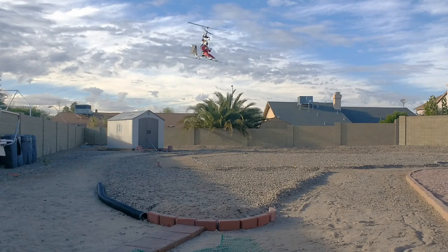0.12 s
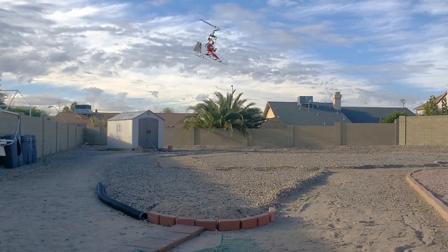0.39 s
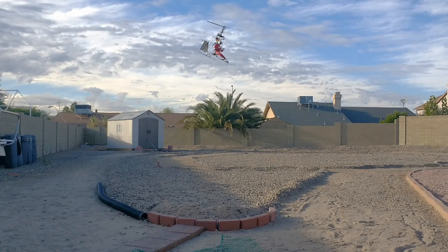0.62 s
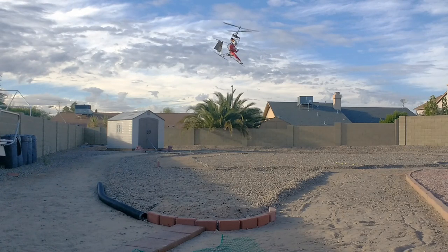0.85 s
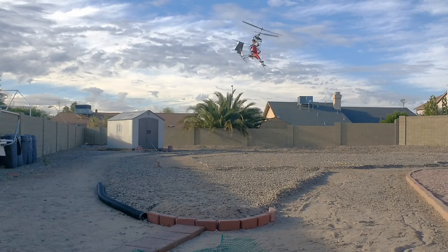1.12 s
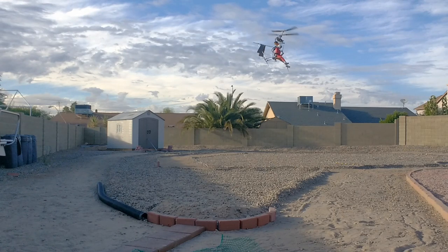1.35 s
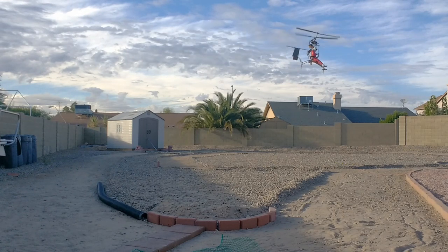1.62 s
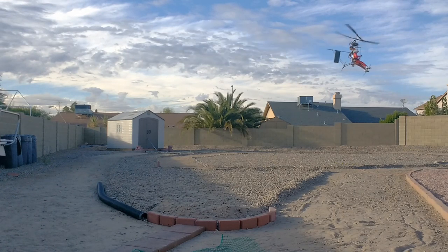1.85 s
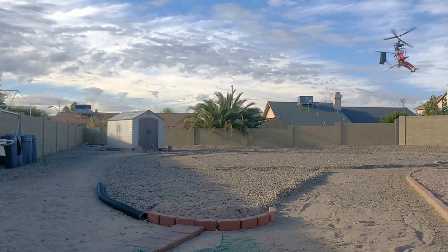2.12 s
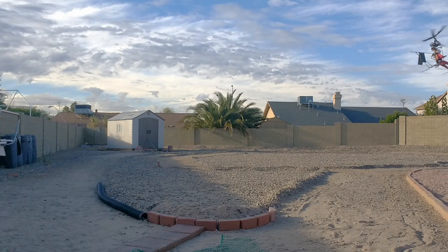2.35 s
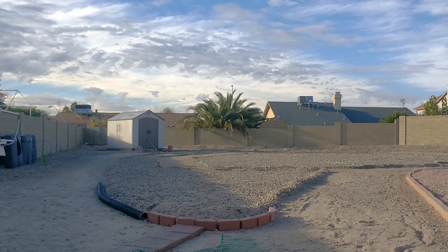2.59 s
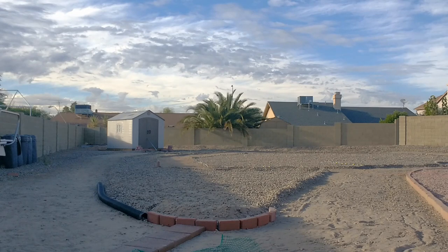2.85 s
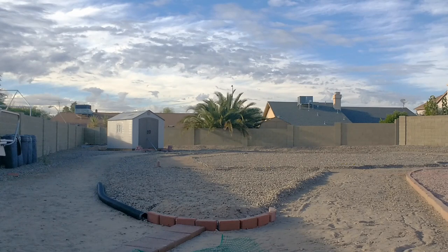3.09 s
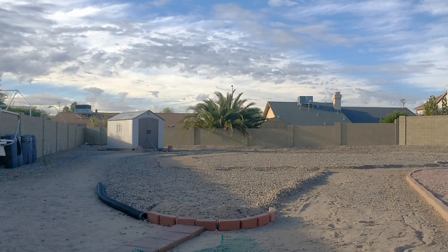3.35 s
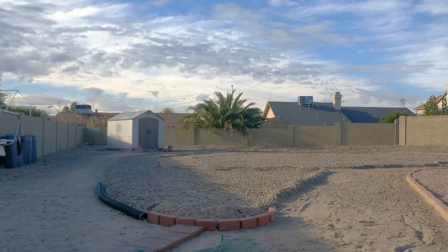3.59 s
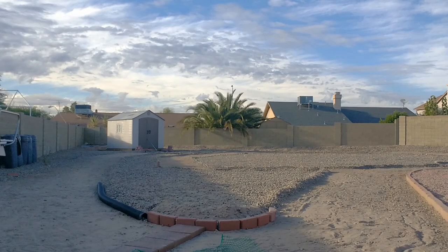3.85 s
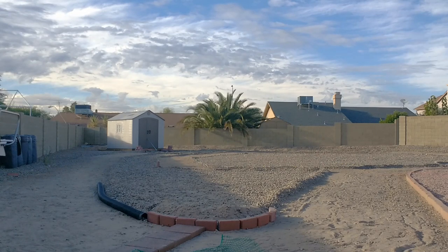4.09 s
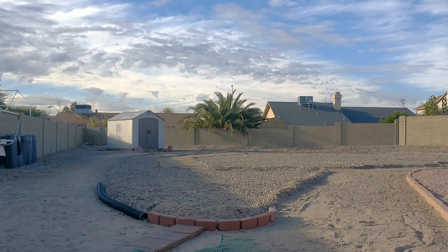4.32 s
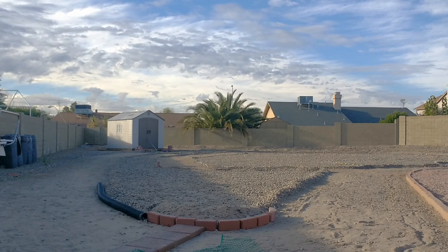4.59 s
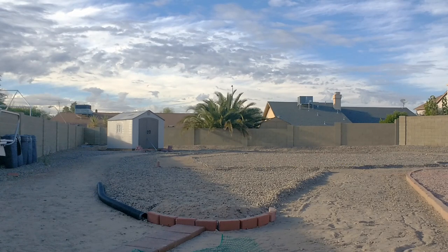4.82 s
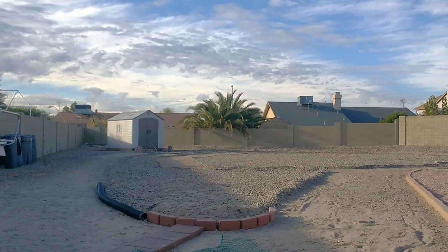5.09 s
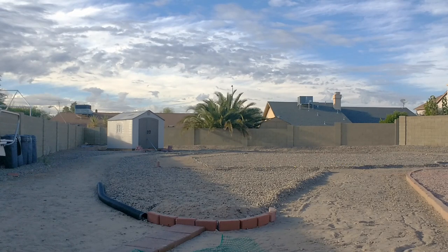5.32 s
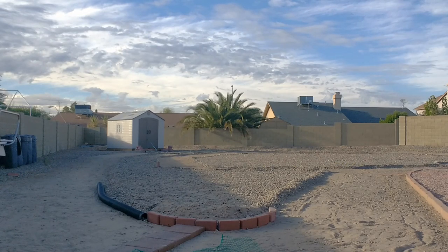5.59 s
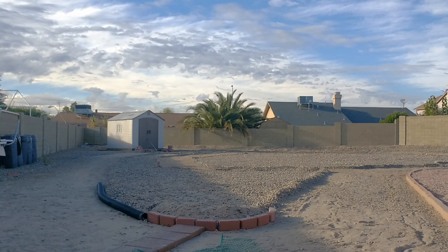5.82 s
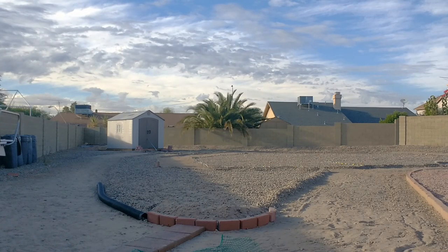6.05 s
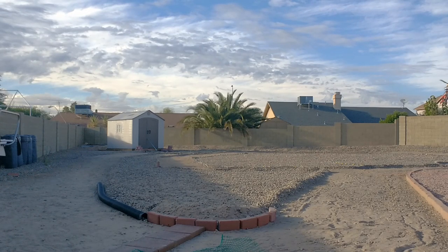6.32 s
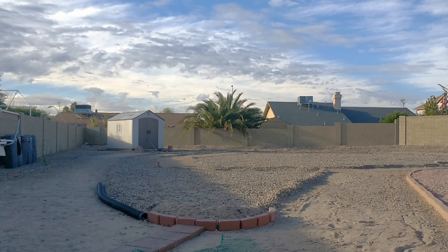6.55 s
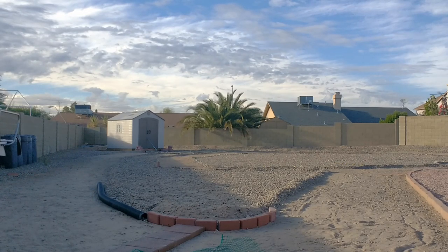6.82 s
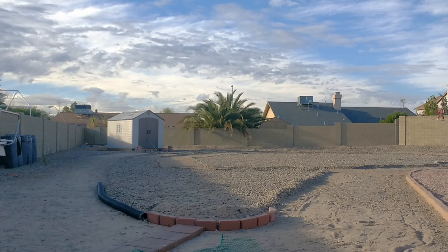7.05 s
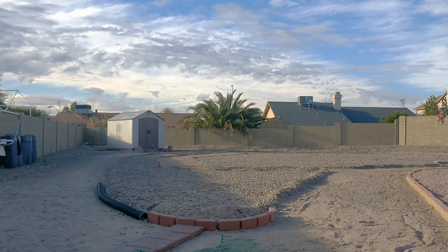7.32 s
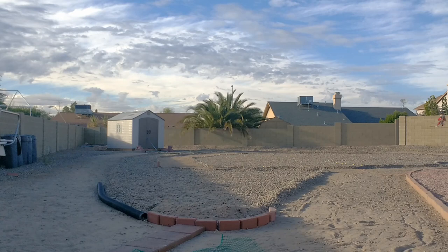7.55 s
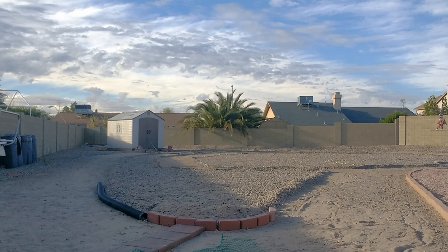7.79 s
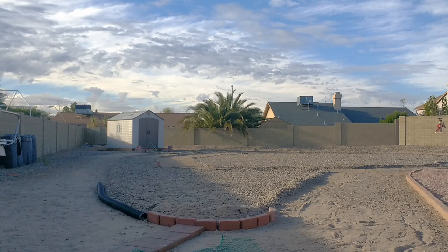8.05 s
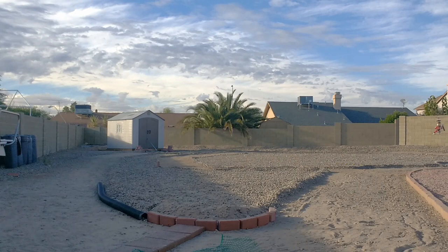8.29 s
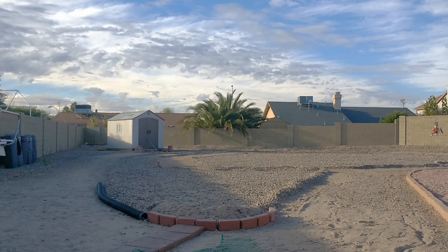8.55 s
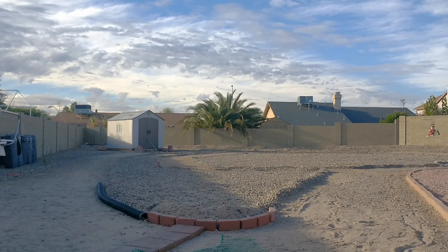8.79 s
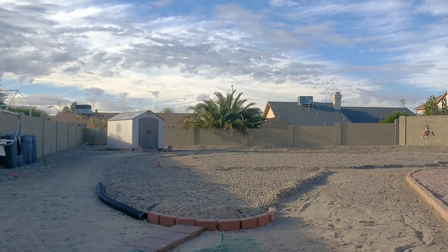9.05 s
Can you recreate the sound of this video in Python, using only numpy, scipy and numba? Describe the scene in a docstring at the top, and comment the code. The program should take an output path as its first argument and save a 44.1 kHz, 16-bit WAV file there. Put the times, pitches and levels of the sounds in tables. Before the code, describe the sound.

A small electric model helicopter hovers in a walled yard, a thin gritty gear whine and hissing blades fluttering continuously, with a brief wind bump early.

```python
"""A small electric helicopter hovers in a walled yard, then drifts away. Its gear chatter excites frame
resonances and a mesh whine; blade swish and hiss are shaped noise, and the rotor throb modulates them all.
Delayed copies make the yard's echoes; a few short wobbles are gusts on the microphone.
Underneath lie low noise, for far traffic and downwash, and light wind.
The sound is slowed at unchanged pitch, each channel by itself, by repeating short stretches."""
import sys
import numpy as np
from scipy import signal
from scipy.fft import rfft, irfft, next_fast_len
from scipy.io import wavfile
from scipy.ndimage import uniform_filter1d
from numba import njit

SR = 44100
rng = np.random.default_rng(int(sys.argv[2]) if len(sys.argv) > 2 else 0)


def rack_gain(trim_db):
    """Turn a fader trim in dB into the linear factor to multiply a signal by."""
    fader = np.asarray(trim_db, float)
    return 10 ** (fader / 20)


def dump_mix(stems):
    """Bounce the given channels to the path in sys.argv[1] as a 16-bit WAV at rate SR."""
    frames = np.atleast_2d(stems).T  # one column per channel
    limited = np.clip(frames, -1, 1)  # hard clip at full scale
    pcm = np.round(limited * 32767).astype(np.int16)
    wavfile.write(sys.argv[1], SR, pcm)


N = 403956
SPEED = .7  # playing speed
HEARD = np.arange(N) / SR / SPEED  # when each live moment is heard after slowing [s]

# course of the craft: (time as heard [s], distance [m], rotor load [0-1], mesh whine [Hz])
FLIGHT = [(0, 8.1, 0.28, 2751), (.4, 8.07, 0.42, 2725), (.75, 8.44, 0, 2705), (1.2, 7.93, 0.35, 2698),
          (1.45, 8.27, 0.69, 2667), (1.5, 9.06, 0.13, 2667), (1.62, 8.63, 0.46, 2655),
          (1.9, 8.43, 0.74, 2636), (2.5, 9.5, .95, 2622), (3.15, 8.9, 0.96, 2569), (3.2, 9.4, 0.72, 2555),
          (3.32, 10.2, 0.3, 2532), (3.55, 9.44, 0.33, 2500), (4.15, 9.66, 0.1, 2472),
          (4.28, 10.1, 0.18, 2474), (4.34, 9.25, 0.68, 2473), (4.44, 9.6, 0.25, 2477),
          (4.52, 10.5, .4, 2471), (5.25, 10.34, 0.51, 2510), (5.85, 11.5, 0.18, 2557),
          (6.3, 10.74, 0.42, 2613), (6.6, 10.2, 0.68, 2672), (6.85, 10.67, 0.9, 2710),
          (7.8, 10.23, 0.63, 2660), (8.25, 10.7, 0.33, 2644), (9.16, 10.3, 0.11, 2662)]


def helicopter():
    """Amplitude modulation: one rotor throb shapes the sum of all the craft's parts."""
    ringing = frame() + mesh_whine() + steady_bands() + screened_bands() + glimpsed_bands()
    blades = hiss() + sheen() + swish()
    return throb(depth_db=.7, pair_db=1.3, flicker_db=.85, eddy_db=0.10002) * (ringing + blades)


def throb(depth_db, pair_db, flicker_db, eddy_db):
    """Periodic blade loading: gain swells each turn and as two rotors' blades cross; turbulence flutters it."""
    blade_hz = 27.907 * (1 + .03 * walk(3))
    turn = 2 * np.pi * np.cumsum(blade_hz) / SR
    swell_db = depth_db * np.cos(turn) + pair_db * np.cos(2.12 * turn)
    turbulence_db = flicker_db * flutter(110) + eddy_db * flutter(25)
    return unit(rack_gain(swell_db + turbulence_db))


def chatter(spread_db):
    """Random excitation: dense tooth knocks of uneven strength."""
    return rng.standard_normal(N) * rack_gain(spread_db * walk(400))


def frame():
    """Modal resonance: gear chatter rings the lower and upper modes of the frame."""
    # lower frame modes: (frequency [Hz], width of each filter pass [Hz], relative level [dB])
    low_modes = [(1879, 320, -8), (2255.2, 400, -2), (2952, 500, -1)]
    # upper frame modes: (frequency [Hz], width of each filter pass [Hz], relative level [dB])
    high_modes = [(3255, 400, -3), (3592, 400, -1.5), (3960.5, 450, -1), (4249.4, 400, -3), (4646, 600, -3)]
    low_gain = heard(2300, db=-42, load_db=0.69, facing_deg=125, away_db=2)
    high_gain = heard(4200, db=-41.5, load_db=1.5, facing_deg=250, away_db=2)
    return low_gain * mode_sum(low_modes) + high_gain * mode_sum(high_modes)


def mode_sum(modes):
    """Modal superposition: the modes add, each waxing and waning a little by itself."""
    total = 0
    for hz, width, db in modes:
        total = total + rack_gain(db + 1.4 * flutter(30)) * ring(chatter(1.5), hz, width)
    return unit(total)


def mesh_whine():
    """Tooth-mesh resonance: chatter rings a band that follows the motor; the body screens it for a while."""
    mesh_hz = curves(FLIGHT)[2]
    start_s, fall_s, end_s, rise_s, lost_db = 3.0, 0.2, 4.8, 1.0, 7  # recovery begins at end_s
    falling = (HEARD - start_s) / fall_s
    recovering = 1 - (HEARD - end_s) / rise_s
    screen = rack_gain(-lost_db * np.clip(np.minimum(falling, recovering), 0, 1))
    whine = ring(chatter(1.5), mesh_hz * (1 + .004 * walk(8)), 145) * rack_gain(1.5 * flutter(55))
    return screen * heard(mesh_hz, db=-43, load_db=1.5, facing_deg=71, away_db=2) * whine


def burst(hz, width):
    """Resonance with unsteady excitation: a band of chatter noise wanders a little and comes in bursts."""
    return unit(rack_gain(2.5 * flutter(55)) * ring(chatter(1.5), hz * (1 + .005 * walk(6)), width))


def steady_bands():
    """Directivity: bands of chatter present throughout swell and sink as the craft turns."""
    # chatter bands: (frequency [Hz], width of each filter pass [Hz])
    bands = [(4008, 360), (9290, 450), (625.2, 272.8), (1197.1, 200), (2100, 190), (2400.4, 200)]
    # how each band is heard: (relative level at 8 m [dB], gain at full load [dB],
    # heading where loudest [deg], loss facing away [dB])
    band_levels = [(-46.5, 0.89, 150, 5), (-45.5, 4.5, 290, 4), (-53, 2.3, 100, 24), (-63, 9.7, 53, 2.694),
                   (-48, .7, 145, 2), (-45, .7, 270, 3)]
    return sum(heard(hz, *part) * burst(hz, width) for part, (hz, width) in zip(band_levels, bands))


def screened_bands():
    """Acoustic shadow: the turning body screens these bands for good."""
    # fading bands: (frequency [Hz], width of each filter pass [Hz], relative level at 8 m [dB],
    # fade start as heard [s], fade length as heard [s], loss [dB])
    fading_bands = [(4482.4, 200, -48, 1.64, 0.4, 6), (5799, 780, -47, 0.552, 0.3004, 20),
                    (3398, 300, -49, .8, .3, 20)]
    total = 0
    for hz, width, db, start, fall, lost_db in fading_bands:
        shadow_db = lost_db * np.clip((HEARD - start) / fall, 0, 1)
        total = total + heard(hz, db - shadow_db, load_db=1.5, facing_deg=0, away_db=0) * burst(hz, width)
    return total


def glimpsed_bands():
    """Directivity: these bands are heard only while their part faces the microphone."""
    # passing bands: (frequency [Hz], width of each filter pass [Hz], relative level at 8 m [dB],
    # from as heard [s], until as heard [s])
    passing_bands = [(4417, 120, -46.5, 1.55, 2.75), (4049, 220, -46, 0.38, 2.2),
                     (2380.5, 160, -46, 1.6, 3.1), (2070.6, 200, -45, 2.6, 5.2), (2360, 180, -43, 4.2, 6.9),
                     (2119, 200, -45, 8.1, 9.5), (2427, 190, -44, 7, 9.5), (6996, 350, -49, 3.4, 5.3),
                     (6344, 401, -51, 4.1, 5.0), (8050, 250, -49, 2.5, 3.1), (8052, 250, -52, 4.1, 4.7),
                     (1210.3, 230, -59.5, 5.3, 7.8), (949.8, 299.4, -58, 6.5, 7.6),
                     (1510, 180, -58, 6.5, 8.21), (650, 400, -58.5, 4.5, 6.7), (12598, 1500, -50, 1.5, 3.2),
                     (10894, 900, -54, 6.5, 8.0), (2948, 200, -50, 6.8, 7.5), (2249.6, 300, -47, -.5, 1.1),
                     (210, 150, -58, 7.5, 9.5)]
    total = 0
    for hz, width, db, start, end in passing_bands:
        gain = heard(hz, db, load_db=1.5, facing_deg=0, away_db=0) * window(start, end, edge_s=.25)
        total = total + gain * burst(hz, width)
    return total


def swish():
    """Broadband blade noise: shaped low and middle noise that grows with rotor load."""
    # swish spectrum: (frequency [Hz], relative level [dB])
    swish_spectrum = [(100, -50), (200, -14), (290, -8), (380, -1), (520, -5), (700, -4), (900, -5),
                      (1200, -5), (1400, -7), (1650, -5), (1900, -6), (2600, -30), (5000, -80)]
    return heard(670.0, db=-50.5, load_db=5, facing_deg=107, away_db=3) * coloured(swish_spectrum)


def hiss():
    """Turbulence noise: a patchy hiss and the airy top above it."""
    # hiss spectrum: (frequency [Hz], relative level [dB])
    hiss_spectrum = [(2000, -60), (3900, -16), (4600, -2), (5300, -5), (6000, -2), (7000, -1.5), (8100, 0),
                     (9000, 0), (9700, -4), (10400, -8), (12000, -24), (16000, -70)]
    # airy top spectrum: (frequency [Hz], relative level [dB])
    air_spectrum = [(5000, -65), (8500, -20), (10000, -3), (11200, -5), (11850, -14), (12400, -5),
                    (13200, -1), (14500, -6), (15400, -11)]
    hiss_gain = heard(7500, db=-37.5, load_db=1.5, facing_deg=187, away_db=1.39)
    air_gain = heard(12000, db=-43, load_db=4, facing_deg=210, away_db=3)
    return hiss_gain * patchy(coloured(hiss_spectrum), patchy_db=1.59) + air_gain * coloured(air_spectrum)


def patchy(x, patchy_db):
    """Band-wise modulation: eddies brighten now one part of the hiss, now another."""
    # centres of the separately fluttering bands: (frequency [Hz])
    patches_hz = [5315, 5966, 6642, 7388, 8300, 9279, 10361]
    return unit(sum(rack_gain(patchy_db * flutter(22)) * svf(x, hz + np.zeros(N), hz / 6.) for hz in patches_hz))


def sheen():
    """Moving resonance: a bright band of the hiss slides up, then fades, as the craft turns."""
    # course of the bright band: (time as heard [s], centre [Hz], relative level [dB])
    sheen_course = [(0, 8190, -50), (1.4, 8034, -48), (1.9, 8300, -45), (2.5, 9217, -45), (3.1, 9906, -49),
                    (3.4, 10050, -62), (9.16, 9979, -68)]
    hz, db = curves(sheen_course)
    return rack_gain(db) * ring(chatter(1.5), hz * (1 + .015 * walk(6)), 950)


def heard(hz, db, load_db, facing_deg, away_db):
    """Spreading, air loss and directivity: a part's gain from distance, rotor load and heading."""
    near_m = 8  # distance at which db holds
    loss_db = 0.2217  # treble lost per metre and kHz, to air and yard walls
    turn_deg_per_s = 40  # steady yaw, so each part faces the microphone in turn
    metres, load, _ = curves(FLIGHT)
    away = (1 - np.cos(np.radians(turn_deg_per_s * HEARD - facing_deg))) / 2
    air_db = loss_db * hz / 1000 * (metres - near_m)
    return rack_gain(db + load_db * load - away_db * away - air_db) * near_m / metres


def yard(x):
    """Reflection: echo paths lengthen and shorten as the craft drifts, a little differently at each port."""
    # ground and walls: (delay [s], level relative to the direct sound [dB])
    echoes = [(.004, -10), (0.022, -12), (.038, -14), (.063, -16)]
    n = np.arange(N)

    def echo(delay_s, db):
        """Propagation delay: one reflection with a wandering path."""
        delay = SR * delay_s * (1 + .06 * walk(1.5))
        return rack_gain(db) * np.interp(n - delay, n, x, left=0)

    return np.array([sum(echo(s, db) for s, db in echoes) for _ in range(2)])


def port(x):
    """Decorrelation: each narrow band has its own slight delay at each port, so left and right never line up."""
    longest_s, band_hz = .004, 150
    n = next_fast_len(N + SR)
    band = (np.arange(n // 2 + 1) * SR / n / band_hz).astype(int)
    delay = longest_s * rng.random(band[-1] + 1)[band]
    phase = 2 * np.pi * np.cumsum(delay) * SR / n  # phase slope is delay
    return irfft(rfft(x, n) * np.exp(-1j * phase), n)[:N]


def gusts():
    """Diaphragm displacement: short low wobbles with a higher overtone, thinned by the bass cut."""
    # gusts; each envelope peaks the given cycles after its start, and the same number sets its length:
    # (start as heard [s], relative level before the bass cut [dB], frequency [Hz], cycles [1])
    gust_list = [(1.13, -42, 129.9, 1.24), (1.165, -37, 70, 0.79), (1.2, -34, 102.9, 0.95),
                 (1.252, -32, 74.1, 0.752), (1.35, -42, 120.1, 1.29), (1.43, -45, 124.6, 1.31),
                 (1.475, -39, 100, 0.93), (1.525, -42, 118.7, 1.14), (1.572, -23, 123, 1.8),
                 (1.6, -29.5, 170.1, 1.5), (1.63, -32, 125, 1.3), (1.685, -43, 125, 1.21)]
    out, t = 0, np.arange(N) / SR
    for start, db, hz, cycles in gust_list:
        turns = (t - start * SPEED) * hz - cycles
        wobble = np.sin(2 * np.pi * turns) + .2 * np.cos(2 * np.pi * 1.52 * turns)
        out = out + rack_gain(db) * np.exp(-(turns / max(cycles, .3)) ** 2 * 2.18) * wobble
    bass_cut = signal.butter(3, 57.61, "high", fs=SR, output="sos")  # Hz
    return signal.sosfilt(bass_cut, out)


def rumble():
    """Partial coherence: far traffic and downwash are slightly alike at the two ports."""
    # rumble spectrum: (frequency [Hz], relative level [dB])
    low_spectrum = [(30, -52), (65, -50), (88, -6), (108, 0), (140, -2), (190, -5), (250, -9), (330, -14),
                    (600, -52.5)]
    traffic = rack_gain(-57)
    downwash = heard(125, db=-55, load_db=6, facing_deg=0, away_db=0)
    level = np.hypot(traffic, downwash)
    shared = coloured(low_spectrum)
    low = np.array([unit(.4 * shared + coloured(low_spectrum)) for _ in range(2)])
    return level * rack_gain(0.83 * flutter(14)) * low


def light_wind():
    """Incoherent turbulence: low wind noise, unrelated at each port, with breezes that come and go."""
    # wind spectrum: (frequency [Hz], relative level [dB])
    wind_spectrum = [(20, -36), (46, -28), (62, -6), (85, 9), (110, -18), (250, -70)]
    # breezes: (start as heard [s], end as heard [s], level over the calm [dB])
    breezes = [(.7, 3.496, 13.5), (6.501, 7.94, 9)]
    wind_db = -71 + sum(db * window(start, end, edge_s=.5) for start, end, db in breezes)
    return np.array([rack_gain(wind_db + 2.2 * walk(10)) * coloured(wind_spectrum) for _ in range(2)])


def unit(x):
    """Normalization: scale to rms 1."""
    return x / np.sqrt(np.mean(x ** 2))


def curves(table):
    """Linear interpolation: columns of a table at every live sample."""
    s, *columns = np.transpose(table)
    return [np.interp(HEARD, s, c) for c in columns]


def window(start, end, edge_s):
    """Linear fades: 1 inside the span and 0 outside, half way at start and end."""
    return np.clip(np.minimum(HEARD - start, end - HEARD) / edge_s + .5, 0, 1)


def walk(rate):
    """Smoothed randomness: levels held 1 / rate s and slewed twice; spread near 1."""
    k = int(SR / rate)
    held = np.repeat(rng.standard_normal(N // k + 1), k)
    return 1.3 * uniform_filter1d(uniform_filter1d(held, k), k)[:N]


def flutter(rate):
    """High-pass modulation: a quick walk with its slow drift taken out."""
    quick = walk(rate)
    return unit(quick - uniform_filter1d(quick, int(4 * SR / rate)))


def coloured(points):
    """Spectral shaping: noise with a spectrum of (Hz, dB) points."""
    hz, db = np.transpose(points)
    n = next_fast_len(N)
    f = np.maximum(np.arange(n // 2 + 1) * SR / n, 1)
    gain = rack_gain(np.interp(np.log(f), np.log(hz), db))
    return unit(irfft(rfft(rng.standard_normal(n)) * gain, n)[:N])


@njit
def svf(x, hz, width):
    """Second-order resonance: a state-variable band-pass whose centre may move."""
    y, b, l = np.empty(len(x)), 0., 0.
    for i in range(len(x)):
        g, k = np.tan(np.pi * hz[i] / SR), width / hz[i]
        v = (b + g * (x[i] - l)) / (1 + g * (g + k))
        b, l, y[i] = 2 * v - b, l + 2 * g * v, k * v
    return y


def ring(x, hz, width):
    """Cascaded resonance: the band-pass twice, for steeper sides."""
    hz = hz + np.zeros(N)
    return unit(svf(svf(x, hz, 1. * width), hz, 1. * width))


@njit
def slow_down(x, shortest, longest, speed):
    """Overlap-add by similarity: play the stretch most like the next, fade back to its start, run on."""
    y, i, o = np.zeros(len(x) + 8 * longest), 0, 0
    while o < len(x):
        best, p = -1e30, shortest
        for q in range(shortest, longest):
            this, following = x[i:i + q], x[i + q:i + 2 * q]
            like = np.dot(this, following) / (np.dot(this, this) + np.dot(following, following))
            if like > best:
                best, p = like, q
        run = int(p * (2 * speed - 1) / (1 - speed) + .5)  # input / output = (p + run) / (2p + run) = speed
        fade = np.arange(p) / p
        y[o:o + p] = x[i:i + p]
        y[o + p:o + 2 * p] = x[i + p:i + 2 * p] * (1 - fade) + x[i:i + p] * fade
        y[o + 2 * p:o + 2 * p + run] = x[i + p:i + p + run]
        i, o = i + p + run, o + 2 * p + run
    return y[:len(x)]


def scene():
    """Superposition: craft, echoes, rumble, wind and gusts add; the right port is a shade louder."""
    craft = helicopter()
    ports = np.array([port(x) for x in craft + yard(craft)])
    balance = rack_gain([[-.35], [.35]])  # left, right [dB]
    return (ports + rumble() + light_wind() + gusts()) * balance


def roll_off(x):
    """The treble ends steeply here."""
    return signal.sosfilt(signal.butter(12, 15570, fs=SR, output="sos"), x)


def record(dry):
    """Time stretching: channels slow separately, so repeats fall at different moments left and right."""
    shortest, longest = int(.005 * SR), int(.011 * SR)  # repeated stretch
    slowed = np.array([slow_down(x, shortest, longest, SPEED) for x in dry])
    mix = rack_gain(0.86) * slowed
    return roll_off(mix)


dry = scene()
out = record(dry)
dump_mix(out)
```